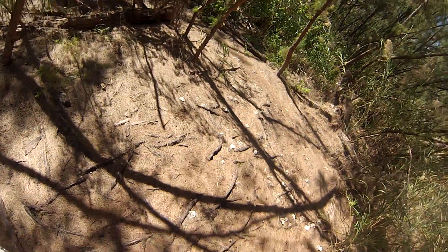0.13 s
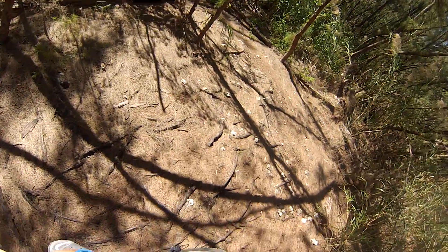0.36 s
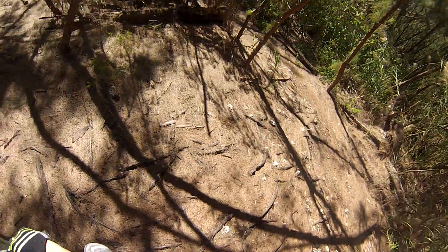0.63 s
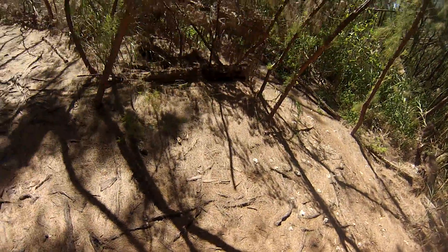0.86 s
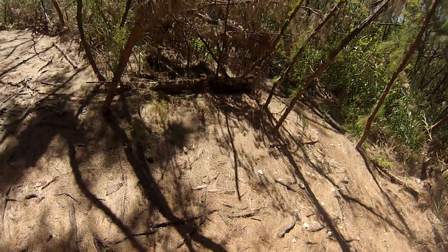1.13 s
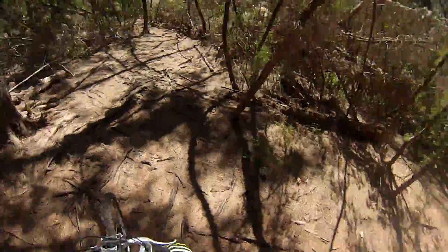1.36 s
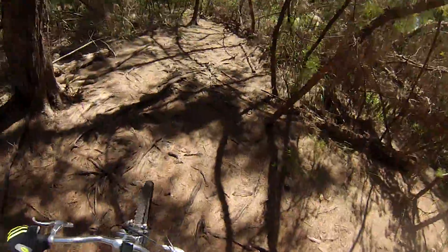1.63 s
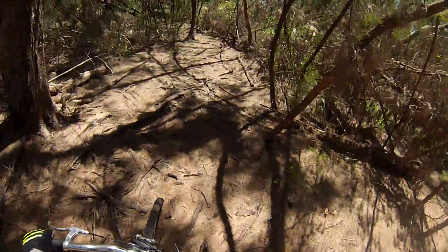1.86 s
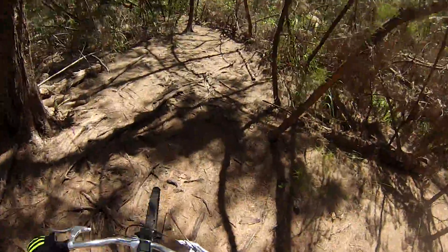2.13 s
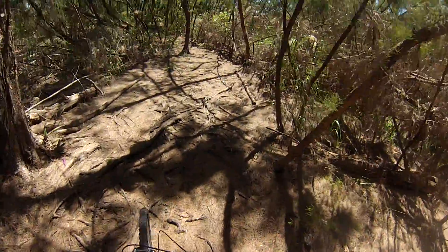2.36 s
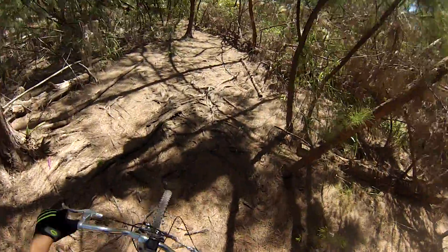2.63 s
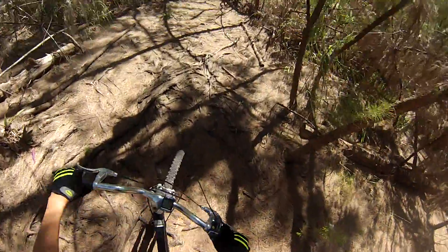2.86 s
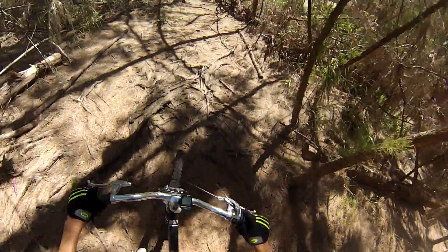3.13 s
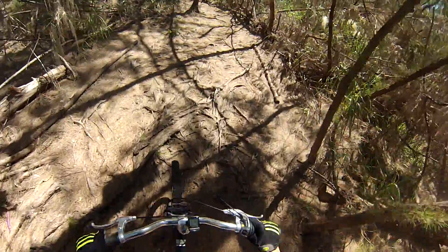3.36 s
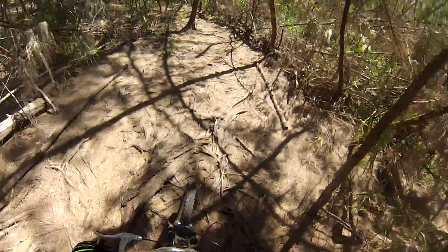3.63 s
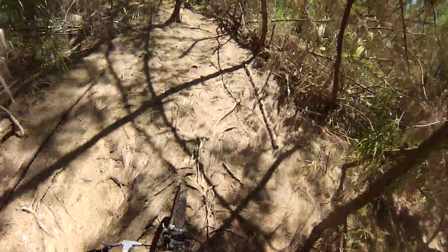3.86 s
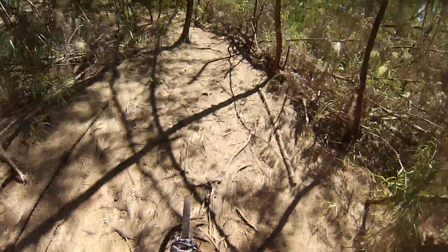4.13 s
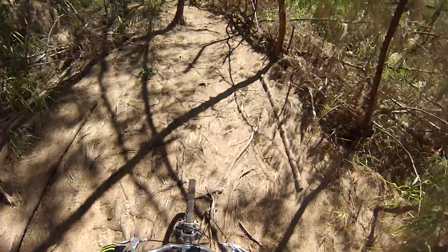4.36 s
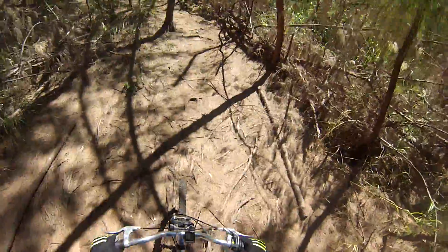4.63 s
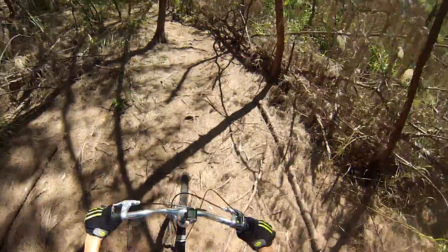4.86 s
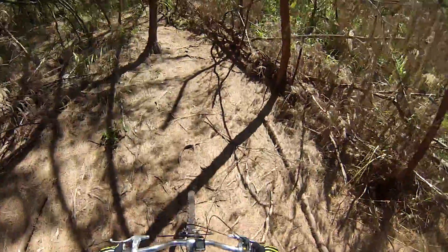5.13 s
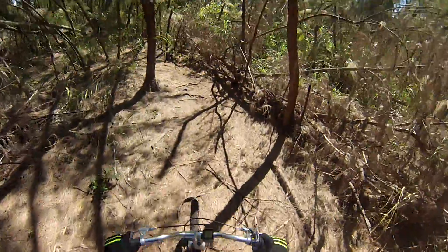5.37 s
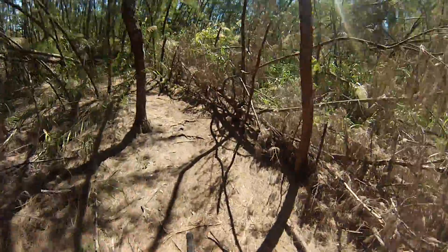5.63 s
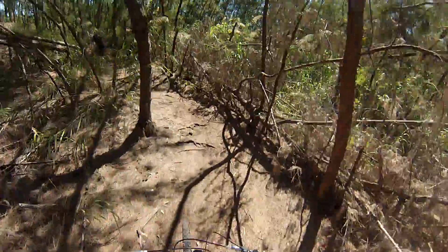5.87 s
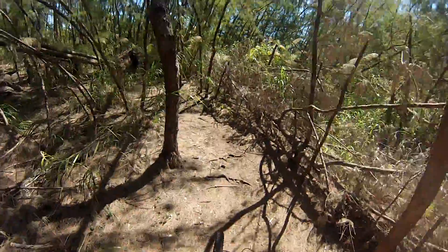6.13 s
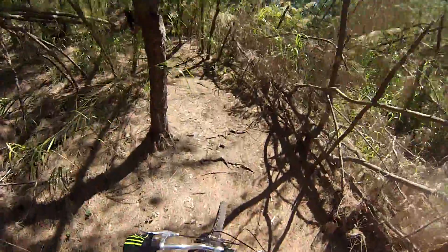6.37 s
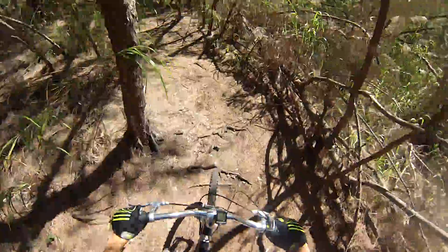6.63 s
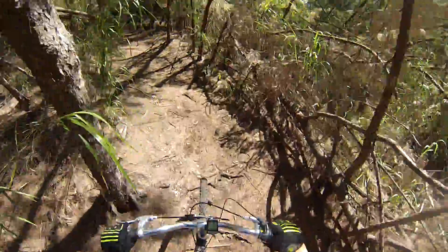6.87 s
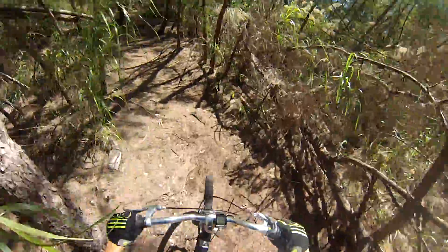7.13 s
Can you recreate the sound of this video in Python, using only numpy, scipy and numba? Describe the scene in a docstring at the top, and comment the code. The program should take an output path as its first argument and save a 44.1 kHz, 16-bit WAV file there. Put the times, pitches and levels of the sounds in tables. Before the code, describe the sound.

Low uneven rumble of a bike on a rough forest trail, very close and dry. Sparse ticks at first, then bassy jolts with hollow plastic knocks and short gritty rubs of a loose mount. One very loud bang overloads the microphone and briefly ducks the rest; afterwards a busy rattle of thumps and clacks continues over even hiss, gradually becoming sparser.

```python
"""Helmet camera on a rough bicycle ride

A small camera in a plastic case on a rider's helmet while a bicycle rolls over sand and roots.
Jolts reach the sealed microphone as deep damped swings over a rumble of shaped noise.
The case knocks, taps and rubs in its loose mount: struck or stick-slip driven damped modes.
The tyres hum once, the preamp hisses evenly with a faint whistle,
and a limiter ducks everything after the hardest knock.
"""
import sys
import numpy as np
from scipy import signal
from scipy.fft import rfft, irfft
from scipy.io import wavfile
from scipy.ndimage import uniform_filter1d
from numba import njit

SR = 44100
rng = np.random.default_rng(int(sys.argv[2]) if len(sys.argv) > 2 else 0)


def linear_from_db(decibels):
    """Turn decibels (scalar or array-like) into linear amplitude factors; 0 gives 1."""
    return 10 ** (np.asarray(decibels, float) / 20)


def to_wav(sig):
    """Store sig (one row per channel, or 1-D mono) as 16-bit WAV at the path in sys.argv[1].

    Samples outside -1..1 are clipped; the rate is SR.
    """
    pcm = np.clip(np.atleast_2d(sig), -1, 1) * 32767
    pcm = np.round(pcm).astype(np.int16)
    wavfile.write(sys.argv[1], SR, pcm.T)  # frames by channels


N = 319504


def unit(x):
    """Scale to rms 1."""
    return x / np.sqrt(np.mean(x ** 2))


def colour(x, points):
    """Shape the spectrum of x by (Hz, dB) points, straight over log frequency; rms 1."""
    hz, db = np.transpose(points)
    bin_hz = np.maximum(np.fft.rfftfreq(len(x), 1 / SR), 1)
    gain = linear_from_db(np.interp(np.log(bin_hz), np.log(hz), db))
    return unit(irfft(rfft(x) * gain, len(x)))


def add(track, start_s, sound):
    """Mix a sound into the track from start_s."""
    i = int(start_s * SR)
    track[i:i + len(sound)] += sound[:N - i]


# Preamp noise spectrum. Each row: frequency in Hz, relative density in dB.
HISS_SPECTRUM = [(88, -12), (150, -6.5), (205, -6.5), (315, -8.5), (354, -9), (494, -11), (998, -15.5),
                 (1390, -15.5), (2870, -22), (14500, -29), (16000, -43.5)]
HISS_RMS_DB = -63


def preamp_hiss():
    """Steady coloured noise of the preamp."""
    return linear_from_db(HISS_RMS_DB) * colour(rng.standard_normal(N), HISS_SPECTRUM)


WHINE_HZ, WHINE_WIDTH_HZ, WHINE_RMS_DB = 11060, 120, -88.5


def electronic_whine():
    """Faint electronic whistle: a narrow band of noise."""
    band_hz = [WHINE_HZ - WHINE_WIDTH_HZ / 2, WHINE_HZ + WHINE_WIDTH_HZ / 2]
    sos = signal.butter(2, band_hz, "band", fs=SR, output="sos")
    return linear_from_db(WHINE_RMS_DB) * unit(signal.sosfilt(sos, rng.standard_normal(N)))


# How hard the ground shakes the bicycle. Each row: time in seconds, deep vibration level in dB.
GROUND = [(0.0, -44.5), (1.19, -48), (1.39, -41), (1.73, -47.5), (2.58, -38), (2.72, -36), (2.88, -31.5),
          (3.08, -40.5), (3.311, -37.5), (3.97, -26), (4.17, -34.5), (4.4, -35.5), (4.58, -34.5),
          (5.0, -36.5), (5.4, -33), (5.9, -33.5), (6.35, -36), (6.53, -27.5), (7.02, -40), (7.24, -32)]
USUAL_DB = -36


def shaking():
    """How far the ground's shaking lies over its usual level, in dB at each sample."""
    time_s, db = np.transpose(GROUND)
    return np.interp(np.arange(N) / SR, time_s, db) - USUAL_DB


# Deep vibration spectrum. Each row: frequency in Hz, relative density in dB.
RUMBLE_SPECTRUM = [(12, 11), (22, 9.5), (35, -4.5), (60, 4.5), (78, -6.5), (110, -29), (200, -72.5)]
# Upper-bass spectrum. Each row: frequency in Hz, relative density in dB.
UPPER_BASS_SPECTRUM = [(60, -13), (90, -6.5), (150, -5.5), (190, -14), (300, -41), (600, -54)]
UPPER_DB = -53  # when the ground shakes at USUAL_DB
UPPER_SLOPE = 1.21  # dB per dB of shaking
STONES_PER_S = 60


def rolling():
    """Irregular deep vibration through frame and body, with a lumpy upper bass from small stones."""
    over_db = shaking()
    deep = colour(rng.standard_normal(N), RUMBLE_SPECTRUM) * linear_from_db(USUAL_DB + over_db)
    stones = unit(rng.standard_normal(N) * (rng.random(N) < STONES_PER_S / SR))
    lumpy = stones + 0.14 * rng.standard_normal(N)
    upper = colour(lumpy, UPPER_BASS_SPECTRUM) * linear_from_db(UPPER_DB + UPPER_SLOPE * over_db)
    return deep + upper


HUM_START_S, HUM_LENGTH_S = 5.4, 0.3
HUM_START_HZ, HUM_SAG_HZ_PER_S = 136, 57
HUM_START_RMS_DB, HUM_SWELL_DB_PER_S = -56.5, 47  # under the fades


def tyre_hum():
    """Tyre knobs hum briefly on firm ground: a sine that sags and swells, faded at both ends."""
    t = np.arange(0, HUM_LENGTH_S, 1 / SR)
    phase = 2 * np.pi * (HUM_START_HZ - HUM_SAG_HZ_PER_S * t / 2) * t
    tone = np.sqrt(2) * np.sin(phase) * linear_from_db(HUM_START_RMS_DB + HUM_SWELL_DB_PER_S * t)
    out = np.zeros(N)
    add(out, HUM_START_S, tone * signal.windows.tukey(len(t), .3))
    return out


def ring_of(hz, gain, t60_s, contact_s):
    """Damped modes after one short push; peak 1."""
    t = np.arange(SR // 10) / SR
    ring = np.sum(gain * np.sin(2 * np.pi * hz * t) * 1000. ** (-t / t60_s), axis=0)
    ring = ring * (1 - np.exp(-t / contact_s)) ** 2  # the contact builds up
    return ring / np.max(np.abs(ring))


# Modes of the case. Each row: frequency in Hz, level in dB struck on its face, t60 in seconds,
# side of the wall that moves first (1 or -1).
CASE_MODES = [(490, -19, .06, 1), (820, -15, .02, 1), (1030, 0, .026, 1), (1250, -16, .018, 1),
              (1530, -5, .019, 1), (1860, -2, .018, -1), (2230, -4, .015, -1), (2650, -16, .018, 1),
              (2950, -24, .016, -1), (3200, -10, .014, 1), (3600, -16, .012, -1), (5040, -27, .011, 1),
              (6220, -24, .009, -1), (7190, -34, .011, 1), (8400, -36, .009, -1)]
# The same modes under a sliding contact. Each entry: level in dB.
SLIDE_MODES_DB = [-5.5, -1.5, -0.5, 4.5, -1, -25.5, -2.5, 0.5, -3, -2.5, -22.5, -16, -29.5, -38.5, -48]
SLIDE_DAMPING = 1.4  # the rubbing surface also damps the rings


def slide(slips, contact_s=0.00014):
    """Slips ring the case; every slide runs along a slightly different line."""
    hz, _, t60_s, side = np.transpose(CASE_MODES)[:, :, None]
    level_chance, pitch_chance = rng.standard_normal((2,) + hz.shape)
    gain = side * linear_from_db(np.array(SLIDE_MODES_DB)[:, None] + 1.5 * level_chance)
    ring = ring_of(hz * (1 + .025 * pitch_chance), gain, t60_s / SLIDE_DAMPING, contact_s)
    return signal.fftconvolve(slips, ring / np.sqrt(np.sum(ring ** 2)))


# Tone of the steady rubbing. Each row: frequency in Hz, relative gain in dB.
RUB_COLOUR = [(300, -1), (800, 0.5), (1500, -2.5), (2600, 0.5), (4500, 1)]
# Low creak spectrum. Each row: frequency in Hz, relative gain in dB.
CREAK_SPECTRUM = [(120, -32.5), (230, 0.5), (480, -7.5), (600, -18.5), (1000, -51)]
# Slides in the mount. Each row: start in seconds, length in seconds, level in dB,
# low creak in dB over that level.
SCRAPES = [(2.713, 0.02, -75, 24), (2.845, 0.028, -53, -14), (2.895, 0.023, -45, -7),
           (2.992, 0.065, -56, -7), (3.384, 0.026, -57.5, -12), (3.429, 0.03, -64, -10),
           (3.546, 0.019, -63, -18), (3.666, 0.07, -62, 11), (3.729, 0.046, -37.5, 6),
           (3.786, 0.022, -26, -10), (3.818, .05, -45, -32), (3.91, 0.04, -75, 19),
           (4.005, 0.037, -46.5, 12), (4.051, 0.0058, -46, 4), (4.093, 0.068, -48, -16),
           (4.566, 0.04, -44, 7.5), (4.608, 0.017, -32.5, -0.5), (4.667, 0.052, -54, -19),
           (4.824, 0.038, -57, -18), (4.924, 0.046, -55, -7), (5.036, 0.028, -58, -3),
           (5.098, 0.038, -51.5, 1), (5.306, 0.039, -62, 0), (5.323, 0.054, -52.5, -13),
           (5.423, 0.037, -61, 3), (5.727, 0.05, -46.5, -11), (5.795, 0.1, -50.5, -28),
           (5.927, 0.0045, -43, -10), (5.934, 0.047, -50.5, -8), (5.959, 0.042, -48, -15),
           (6.179, 0.066, -50, -28), (6.249, 0.043, -60.5, -3), (5.51, 0.092, -66, -15),
           (6.375, 0.093, -62, -14), (6.49, 0.069, -70, -11), (6.575, 0.041, -47.5, -7),
           (7.003, 0.11, -59, -12), (7.158, 0.056, -55, -36)]
SLIPS_PER_S, SLIP_UNEVEN_DB = 4000, 2.6
RUB_DB, RUB_SLOPE = -69.5, 1  # level at USUAL_DB; dB per dB of shaking
RUB_PATCHY_DB, RUB_PATCH_S = 1.8, .025


def rubbing():
    """Dense uneven stick-slip clicks ring the case; slides also creak lower down."""
    clicks = (rng.random(N) < SLIPS_PER_S / SR) * rng.standard_normal(N)
    slips = unit(clicks * linear_from_db(SLIP_UNEVEN_DB * rng.exponential(size=N)))
    # the grip of the mount comes and goes
    span = int(RUB_PATCH_S * SR)
    grip = unit(uniform_filter1d(uniform_filter1d(rng.standard_normal(N), span), span))
    steady = colour(slide(slips)[:N], RUB_COLOUR)
    out = steady * linear_from_db(RUB_DB + RUB_SLOPE * shaking() + RUB_PATCHY_DB * grip)
    creak_level = np.zeros(N)
    for start_s, length_s, db, creak_db in SCRAPES:
        count = int(length_s * SR)
        shape = signal.windows.tukey(count, .55) * np.linspace(1.2, .7, count)
        own_slips = np.roll(slips, -int(start_s * SR) - SR)[:count]
        add(out, start_s, slide(linear_from_db(db) * shape * own_slips))
        add(creak_level, start_s, linear_from_db(db + creak_db) * shape)
    return out + creak_level * colour(slips, CREAK_SPECTRUM)


# Taps of small loose parts. Each row: start in seconds, peak in dB, pitch in Hz, t60 in seconds.
TAPS = [(1.211, -46.5, 3230, 0.032), (1.211, -58, 5800, .02), (1.229, -51.5, 1500, 0.038),
        (2.58, -42, 1520, 0.02), (2.711, -41.5, 500, 0.068), (2.998, -59, 3700, 0.025),
        (3.392, -50.5, 1200, 0.024), (3.556, -41.5, 1500, 0.025), (3.659, -54, 1500, 0.037),
        (3.756, -24.5, 1100, 0.0076), (4.124, -28.5, 950, 0.01), (6.019, -56, 1550, 0.04),
        (6.407, -53, 1580, 0.049), (7.209, -51, 3150, 0.017)]


def taps(contact_s=0.00073):
    """Soft contacts wake a single mode of a buckle or strap end."""
    out = np.zeros(N)
    for start_s, db, hz, t60_s in TAPS:
        add(out, start_s, linear_from_db(db) * ring_of(np.array([[hz]]), 1, t60_s, contact_s))
    return out


def swings(table, rise_s):
    """A damped swing for each row; the pressure drops first."""
    out, t = np.zeros(N), np.arange(SR // 3) / SR
    for start_s, db, hz, t60_s in table:
        envelope = (1 - np.exp(-t / rise_s)) * 1000. ** (-t / abs(t60_s))
        swing = -np.sin(2 * np.pi * hz * t) * envelope
        add(out, start_s, linear_from_db(db) * swing / np.max(np.abs(swing)))
    return out


# Thuds of the helmet shell. Each row: start in seconds, peak in dB, pitch in Hz.
THUDS = [(2.03, -40, 148), (2.605, -42, 149), (2.71, -32.5, 155), (2.796, -36, 113), (2.894, -33, 119),
         (3.055, -34.5, 151), (3.427, -40.5, 152), (3.736, -29, 179), (3.794, -3.5, 100), (3.953, -28, 119),
         (4.111, -32.5, 113), (4.327, -37, 109), (4.569, -32.5, 149), (4.607, -33, 133),
         (4.886, -36.5, 137), (5.005, -35.5, 132), (5.103, -37, 138), (5.332, -29.5, 126),
         (5.743, -26.5, 146), (5.848, -43, 188), (5.943, -28, 102), (6.167, -38, 136), (6.349, -32, 109),
         (6.537, -33.5, 111), (6.571, -35, 132), (6.635, -22, 118), (7.155, -36, 108)]
THUD_T60_S = 0.053


def shell_thuds():
    """The helmet shell thuds, mostly higher and shorter than the jolts."""
    return swings([tuple(row) + (THUD_T60_S,) for row in THUDS], rise_s=0.0094)


# Roots under the wheels. Each row: start in seconds, peak in dB, pitch in Hz, t60 in seconds.
JOLTS = [(1.379, -32.5, 57, 0.16), (2.547, -34, 43.6, 0.55), (2.639, -28.5, 12.4, 0.33),
         (2.695, -30, 45, 0.093), (2.811, -23, 25.6, 0.35), (2.879, -27, 37, 0.29), (2.96, -17, 46, 0.17),
         (3.056, -21.5, 44, 0.083), (3.267, -26.5, 71, 0.057), (3.356, -26, 27, 0.27),
         (3.438, -27, 20, 0.065), (3.745, -13, 19.3, 0.4), (3.792, 9, 38, 0.059), (3.956, -14.5, 31, 0.43),
         (4.05, -12.5, 25, 0.051), (4.135, -23.5, 21, 0.25), (4.406, -32, 20.6, 0.75),
         (4.603, -13, 25, 0.16), (4.843, -30.5, 57, 0.19), (4.891, -26.5, 50, 0.15),
         (4.952, -19.5, 38.5, 0.16), (5.124, -18, 23, 0.35), (5.33, -16.5, 47, 0.11),
         (5.379, -28, 31, 0.15), (5.452, -18, 38.6, 0.22), (5.542, -23, 10, 0.072), (5.664, -35, 49, 0.4),
         (5.745, -27, 45, 0.17), (5.869, -20, 21.3, 0.53), (5.949, -15, 49, 0.24), (5.997, -21, 53, 0.17),
         (6.271, -17, 40, 0.22), (6.457, -31, 26.5, 1), (6.577, -19, 37, 0.58), (6.645, -12.5, 50.5, 0.079),
         (6.922, -32, 21.9, 0.6), (7.186, -25, 17.7, 0.41)]


def jolts():
    """Head and helmet swing after each root."""
    return swings(JOLTS, rise_s=0.0066)


# The case modes with the contact at the edge. Each entry: level in dB.
EDGE_MODES_DB = [-16.5, -41.5, 5, 2.5, -1.5, -9.5, -2, 1.5, -1, -5.5, -13, -19.5, -30.5, -52, -46]
EDGE_DAMPING = 1.39  # the edge is gripped, so rings there die faster


def case_ring(bright_db, edge, contact_s):
    """The case struck between face (edge 0) and edge (1); each blow lands a little differently."""
    hz, face_db, t60_s, side = np.transpose(CASE_MODES)[:, :, None]
    edge = np.clip(edge, 0, 1)
    level_chance, pitch_chance = rng.standard_normal((2,) + hz.shape)
    db = face_db + edge * (np.array(EDGE_MODES_DB)[:, None] - face_db)
    db = db + bright_db * np.log2(hz / 1500)
    db = db + (2 + edge) * level_chance
    hz = hz * (1 + (.012 + .025 * edge) * pitch_chance)
    return ring_of(hz, side * linear_from_db(db), t60_s / EDGE_DAMPING ** edge, contact_s)


# Treble crack spectrum. Each row: frequency in Hz, relative density in dB.
CRACK_SPECTRUM = [(2500, -45), (5000, 18), (9000, 3.5), (12000, 7.5), (16000, -37)]
# Knocks in the mount. Each row: start in seconds, ring peak in dB, brightness in dB per octave,
# contact place from face 0 to edge 1.
KNOCKS = [(0.952, -24.5, 3.5, 0.69), (1.103, -35, -1, 0.51), (1.211, -47, 18, .8), (1.231, -41.5, 6, 0.99),
          (2.474, -11, 0.7, 0.23), (2.581, -40.5, 3, 0.96), (2.808, -22, 3, .99), (2.899, -37, -4, .7),
          (2.908, -33, 9, 0.52), (2.914, -30, 7, 1), (3.062, -26, 2.5, .99), (3.281, -31, 1.5, 1),
          (3.454, -31.5, 1.8, .99), (3.584, -37.5, -1.5, .55), (3.683, -16.5, 2.5, .29),
          (3.735, -21.5, -0.5, 0.35), (3.776, -38, 3, 0.73), (3.791, -9, 1, 0.93), (3.7946, 12.1, -2, 0.87),
          (3.795, -9.5, 9, 0.34), (3.814, -20, -0.3, .6), (3.831, -20.5, -3.5, 0.66), (3.952, -47, -9, .66),
          (3.967, -18, 2.5, 0.15), (4.005, -22.5, -3.5, 0.25), (4.036, -32, 3, 0.59),
          (4.046, -16, -5.2, 0.49), (4.384, -15, -1.5, 0.32), (4.564, -31.5, 12, 1),
          (4.567, -14, -1.8, 0.4), (4.61, -36, 10, 0.49), (4.619, -22.5, -3, .71), (4.64, -31, -3.5, 0.67),
          (4.937, -36.5, 6.5, 0.51), (4.991, -46.5, 2, .55), (5.113, -16, -3.4, 0.16),
          (5.299, -21.5, -0.3, 0.35), (5.359, -27, 2, 0.097), (5.721, -22.5, 2.5, .99),
          (5.731, -39, 7, .55), (5.747, -16, -0.5, 0.62), (5.752, -17.5, -3.5, 0.95),
          (5.852, -27.5, -7, 0.96), (5.86, -28, -10, 1), (5.918, -29.5, 3.8, 0.98), (5.93, -34, -14, 0.61),
          (5.97, -24.5, 5, 0.49), (6.275, -39.5, -12, 0.55), (6.383, -45, -4, .7), (6.583, -44, 10, .55),
          (6.593, -18.5, 0.4, 0.7), (6.711, -16, -5.5, 0.32), (7.165, -29, 1, 0.78),
          (7.182, -30.5, -0.7, 0.86)]
CRACK_DB = -35.5  # re the ring peak
CRACK_PER_BRIGHT, CRACK_PER_EDGE_DB = 1.1, 5  # brighter, edgier contacts crack more


def knocks(crack_decay_s=.0022):
    """Single hard contacts of case and mount, each with a short treble crack."""
    out, crack_level, t = np.zeros(N), np.zeros(N), np.arange(SR // 50) / SR
    for start_s, db, bright_db, edge in KNOCKS:
        add(out, start_s, linear_from_db(db) * case_ring(bright_db, edge, contact_s=0.00019))
        crack_db = db + CRACK_DB + CRACK_PER_BRIGHT * bright_db + CRACK_PER_EDGE_DB * edge
        add(crack_level, start_s, linear_from_db(crack_db) * np.exp(-t / crack_decay_s))
    return out + crack_level * colour(rng.standard_normal(N), CRACK_SPECTRUM)


def scene():
    """Everything reaches the microphone through the case, with no room."""
    background = rolling() + tyre_hum() + rubbing()
    contacts = taps() + shell_thuds() + jolts() + knocks()
    return (background + contacts)[None, :]


@njit
def limiter(x, top, attack, release):
    """Gain drops as a smoothed level passes the threshold, then creeps back."""
    y, level = np.empty(len(x)), 0.
    for i in range(len(x)):
        size = abs(x[i])
        level += (size - level) * (attack if size > level else release)
        y[i] = x[i] * min(1., top / (level + 1e-9))
    return y


def low_pass(x):
    """Removes everything above the highest recorded frequency."""
    return signal.sosfilt(signal.butter(12, 16410, fs=SR, output="sos"), x)


def record(dry):
    """Preamp hiss and whistle, then the limiter, soft overload and a steep top cut."""
    attack_s, release_s, threshold_db = .004, .06, -12.0
    overload, top_hz = .8, 15300
    x = dry[0] + preamp_hiss() + electronic_whine()
    x = limiter(x, linear_from_db(threshold_db), 1 / (attack_s * SR), 1 / (release_s * SR))
    x = overload * np.tanh(x / overload)
    x = signal.sosfilt(signal.ellip(8, .2, 60, top_hz, fs=SR, output="sos"), x)
    return low_pass(x[None, :])


dry = scene()
out = record(dry)
to_wav(out)
```